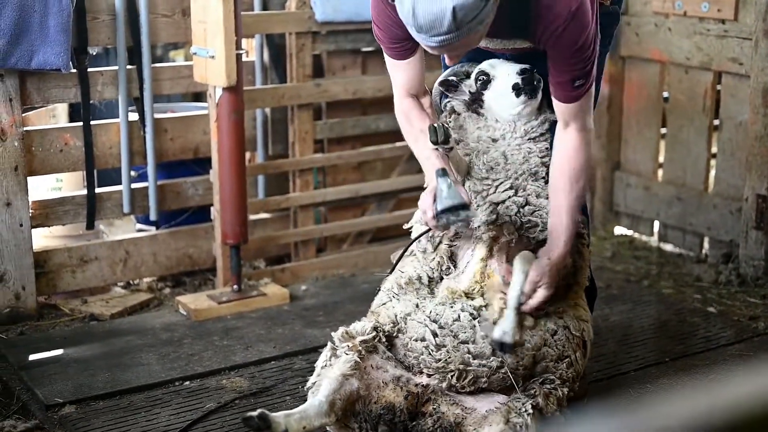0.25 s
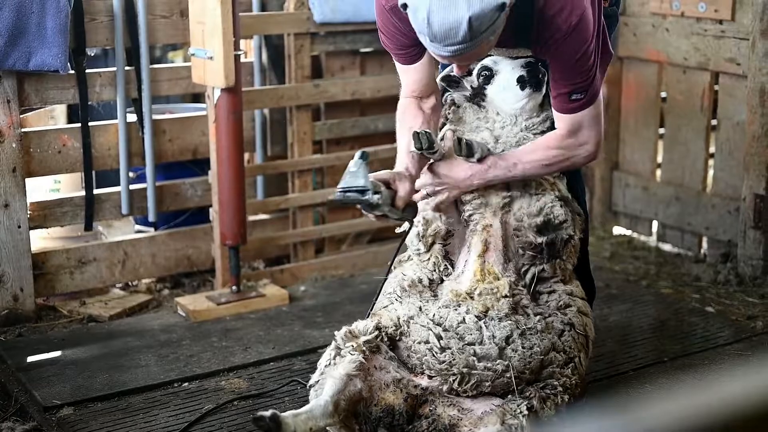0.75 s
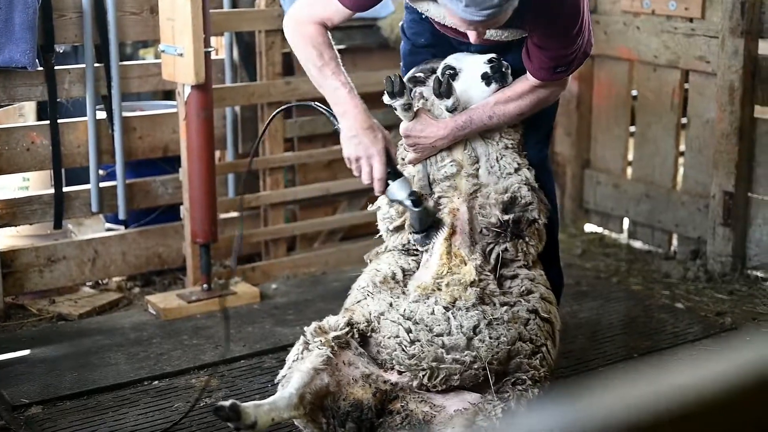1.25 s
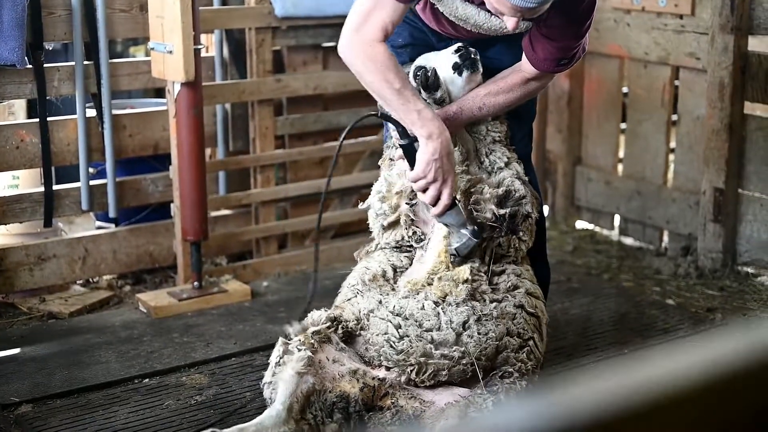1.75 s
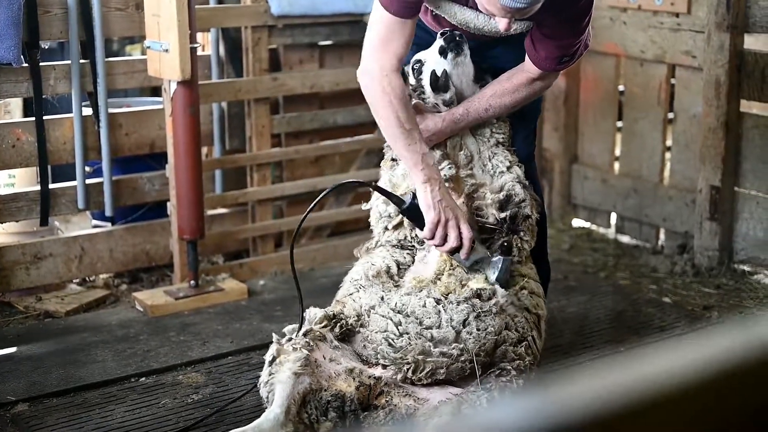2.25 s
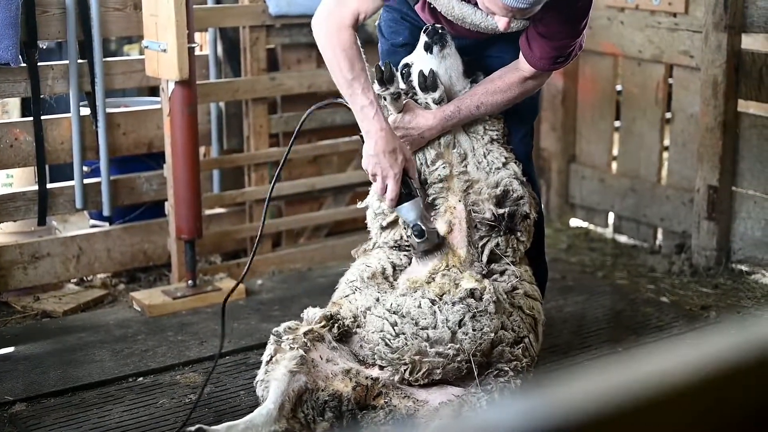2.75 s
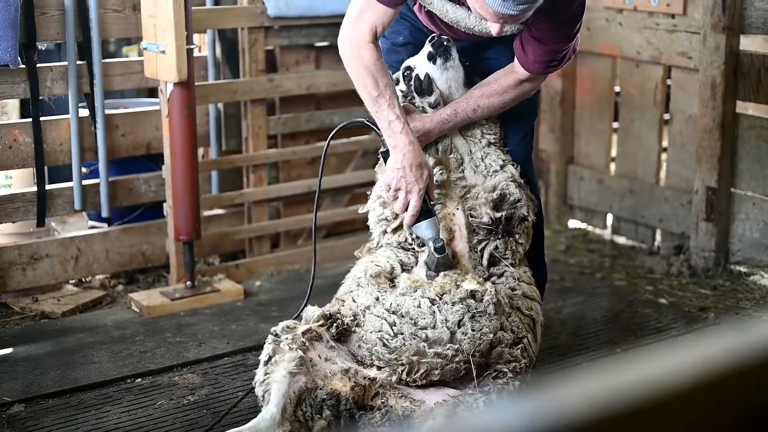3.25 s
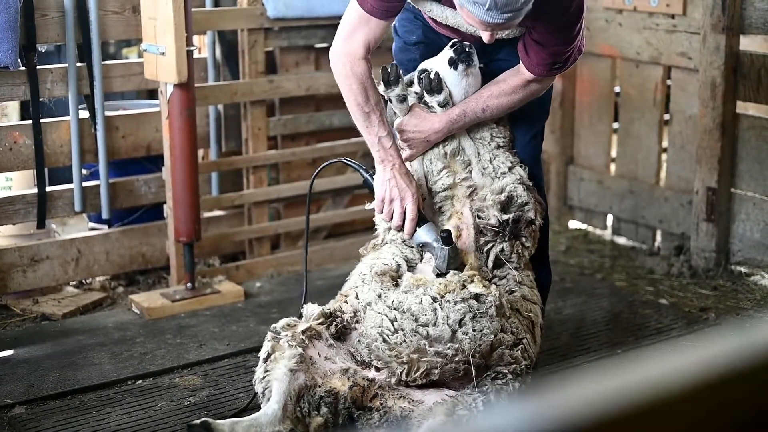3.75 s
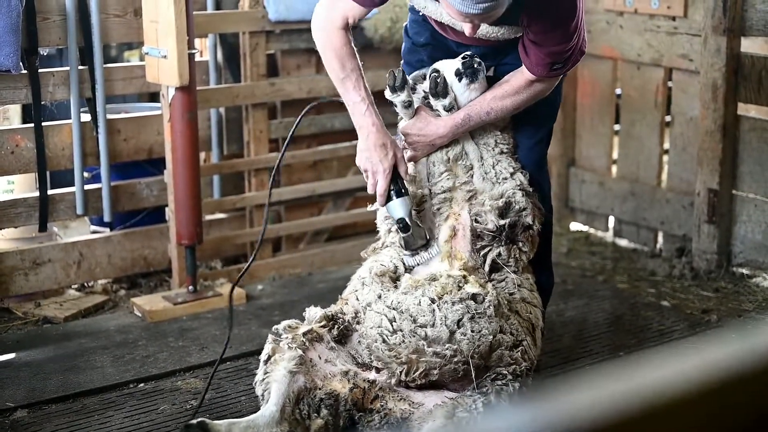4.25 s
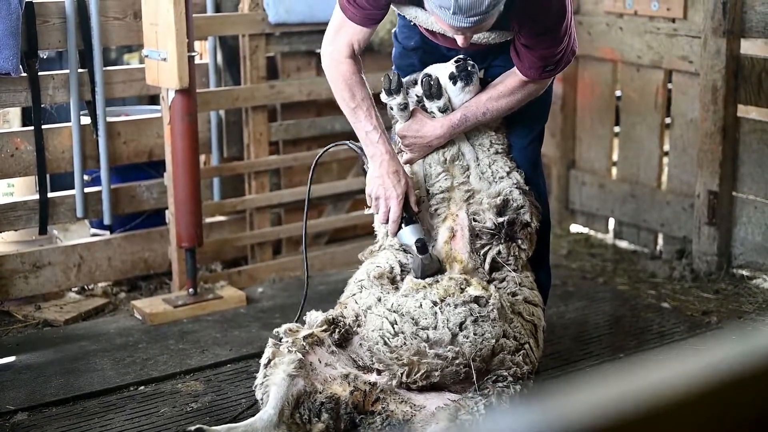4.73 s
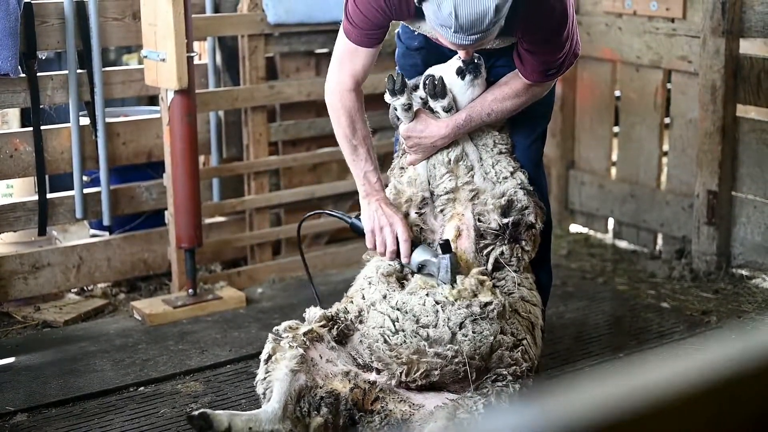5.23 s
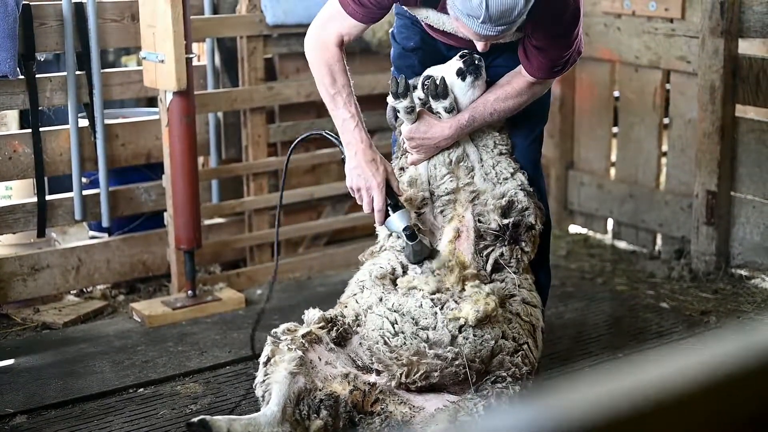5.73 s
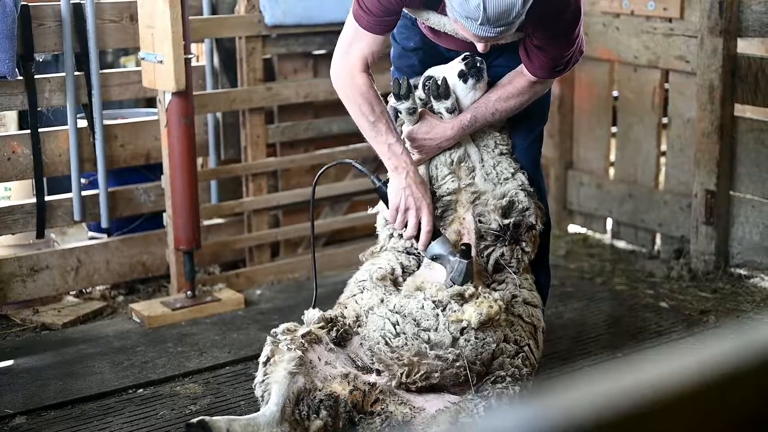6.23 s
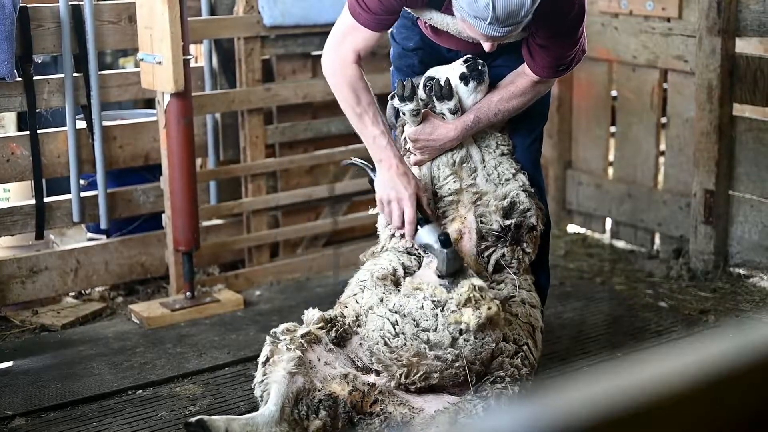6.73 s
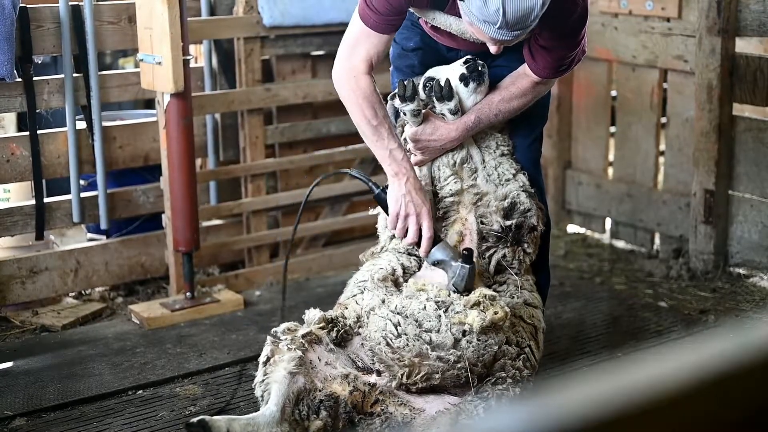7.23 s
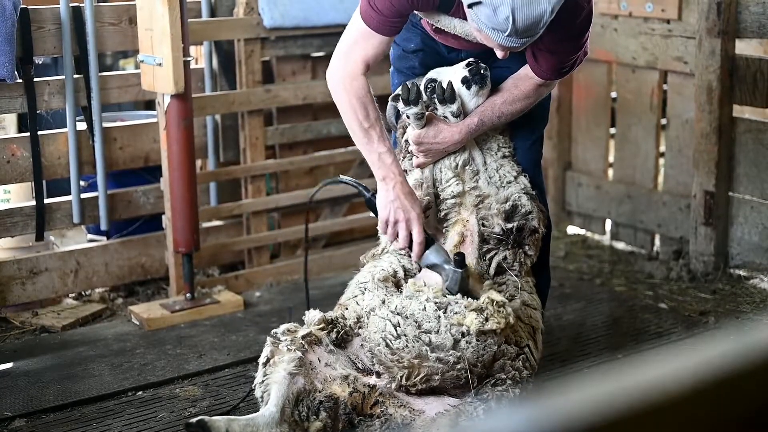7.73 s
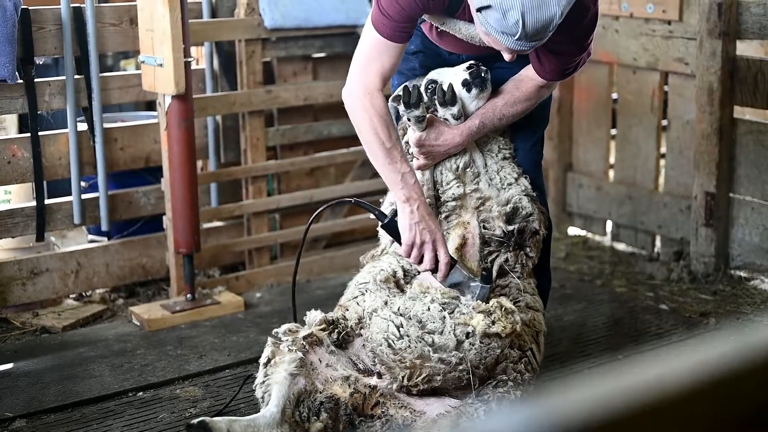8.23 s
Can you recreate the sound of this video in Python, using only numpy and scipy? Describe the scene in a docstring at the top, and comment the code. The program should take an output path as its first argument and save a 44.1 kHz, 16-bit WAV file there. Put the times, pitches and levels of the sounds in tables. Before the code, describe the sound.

Steady high motor whine, rushing fan air and buzzing cutter chatter as a sheep is shorn, its pitch sagging slightly under load.

```python
"""An electric shearing handpiece runs without pause in a wooden shed while a sheep is shorn.
Its motor fan whines and rushes; the geared-down cutter rattles the casing and rasps through the wool.
Each of six blows through the fleece drags the motor down and brings a hollow drone; held clear, the comb sings.
Tones are sines locked to one shaft; rattle, air and rasp are coloured noise under a force envelope.
The tones swell and fade as the hand moves through the shed's echoes, and at times the cutter clicks on the comb."""
import sys
import numpy as np
from scipy import signal
from scipy.fft import rfft, irfft, next_fast_len
from scipy.io import wavfile

SR = 44100
rng = np.random.default_rng(int(sys.argv[2]) if len(sys.argv) > 2 else 0)


def file_out(sig):
    """Save sig as 16-bit WAV at sys.argv[1]."""
    # one column per channel
    cols = np.atleast_2d(sig).T
    # limit, then scale
    lim = np.clip(cols, -1, 1)
    pcm = np.round(lim * 32767).astype(np.int16)
    wavfile.write(sys.argv[1], SR, pcm)


N = 373956
TIME = np.arange(N) / SR
FFT_SIZE = next_fast_len(N, real=True)
HZ = np.maximum(np.arange(FFT_SIZE // 2 + 1) * SR / FFT_SIZE, 1)
FAN_BLADES, ARMATURE_SLOTS = 8, 12
GEAR_RATIO = 41 / 5  # motor turns per cutter cycle

# Blows through the fleece. Each row: start in seconds, end in seconds, drag on the motor in Hz,
# rise of the housing's boom in dB, hollow drone in dB.
BLOWS = [(1.732, 2.264, 14.8, -2, -48), (2.941, 3.97, 22.4, 8, -56), (4.832, 5.539, 18.6, 9, -50),
         (6.001, 7.008, 11.3, 11, -55.5), (7.119, 7.774, 20.2, 4, -53), (7.922, 8.58, 23.7, 5, -57)]
# Colour of the fan's air, also used for the clicks. Each row: frequency in Hz, relative level in dB per Hz.
AIR_COLOUR = [(300, -60), (1200, -11), (2100, -6), (2500, 0), (2850, 0.5), (3200, 1), (3600, -1),
              (4050, -1), (4500, -7), (5200, -11.5), (6300, -8.5), (8000, -18.5), (15000, -33.5)]


def from_db(db):
    """Decibels to gain."""
    return 10 ** (np.asarray(db) / 20)


def rms_one(x):
    """Scale to unit rms."""
    return x / np.sqrt(np.mean(x ** 2) + 1e-20)


def in_time(rows):
    """A curve of (seconds, value) rows, read at every sample."""
    s, value = np.transpose(rows)
    return np.interp(TIME, s, value)


def at_hz(points, hz):
    """Read a table on a log-frequency axis."""
    f, value = np.transpose(points)
    return np.interp(np.log(hz), np.log(f), value)


def resonance_db(centre_hz, width_hz):
    """A resonance with steep skirts, in dB at every frequency."""
    return -20 * np.log10(1 + (2 * (HZ - centre_hz) / width_hz) ** 2)


def drift(rate):
    """Smooth random wander of rms 1, noise low-passed by two equal poles at rate in Hz."""
    step, warm_up = 100, 1000  # samples per slow step; slow steps thrown away
    pole = np.exp(-2 * np.pi * rate * step / SR)
    noise = rng.standard_normal(N // step + 2 + warm_up)
    slow = signal.lfilter([1], [1, -2 * pole, pole * pole], noise)[warm_up:]
    return np.interp(np.arange(N) / step, np.arange(len(slow)), rms_one(slow))


def sides(hz):
    """Left and right gain of the handpiece at these frequencies."""
    # The vents face left. Each row: frequency in Hz, left minus right in dB.
    balance = [(700, 0.5), (1140, 2.5), (1600, 1), (2500, 3.5), (3200, 5.5), (4000, 9.5), (5200, 8),
               (6300, 12.5), (8300, 7), (9900, 12), (11500, 1.5), (13000, -1.5)]
    return from_db(at_hz(balance, hz) * np.array([[.5], [-.5]]))


def cycle_pattern(cycles):
    """Noise that comes back alike in every cutter cycle, its pattern shifting with the grip."""
    grip = 1.2 * drift(1.2)
    one, other = [np.interp(cycles % 1, np.linspace(0, 1, 880), pattern)
                  for pattern in rng.standard_normal((2, 880))]
    return np.cos(grip) * one + np.sin(grip) * other


def radiate(force, spectrum_db, cycles=0, repeat=0):
    """Noise under a force envelope, coloured and spread in stereo; rms 1. The share repeat turns hiss into buzz."""
    # Likeness of the channels. Each row: frequency in Hz, left-right correlation before the balance.
    likeness = [(100, 1), (300, 0.95), (700, 0.82), (1400, 0.85), (2200, 0.42), (3200, 0.064), (5000, 0.38),
                (8000, 0.026), (15000, 0.068)]
    grain, spread = rng.standard_normal((2, N))
    if repeat > 0:
        patterns = [rms_one(cycle_pattern(cycles)), rms_one(cycle_pattern(cycles))]
        grain = np.sqrt(1 - repeat) * grain + np.sqrt(repeat) * patterns[0]
        spread = np.sqrt(1 - repeat) * spread + np.sqrt(repeat) * patterns[1]
    mid, side = rfft(force * np.array([grain, spread]), FFT_SIZE)
    alike = at_hz(likeness, HZ)
    pair = np.sqrt(1 + alike) * mid + np.sqrt(1 - alike) * side * [[1], [-1]]
    coloured = pair * sides(HZ) * from_db(spectrum_db)
    return rms_one(irfft(coloured, FFT_SIZE)[:, :N])


def tone(turns, scatter, rate):
    """A stereo sine plus its wall echoes, whose sum shifts as the hand moves; rms 1."""
    angle = 2 * np.pi * turns
    sine, cosine = np.sin(angle), np.cos(angle)
    return np.array([rms_one((1 + scatter * drift(rate)) * sine + scatter * drift(rate) * cosine)
                     for ear in range(2)])


def strokes(cycles, depth, decay, back_db, uneven_db):
    """The cutter knocks at both ends of its swing, out and back unequally, no two knocks alike."""
    back_at = 0.46  # share of the cutter cycle at which the return knock falls
    back = cycles % 1 >= back_at
    index = 2 * cycles.astype(int) + back
    since = cycles % 1 - back_at * back
    strength = from_db(back_db * back + uneven_db * rng.uniform(-1, 1, 1000)[index])
    return rms_one(1 + depth * strength * np.exp(-2 * since / decay))  # decay in cutter cycles


def arch(start_s, end_s, shape, lead_s):
    """The hand pushes in and eases off again: 0 to 1 to 0."""
    progress = np.clip((TIME + lead_s - start_s) / (end_s - start_s), 0, 1)
    return np.abs(np.sin(np.pi * progress)) ** shape


def swells(rows, shape, lead_s):
    """Each event's values rise and fall in an arch over its length: one curve per column."""
    return sum(np.outer(values, arch(start, end, shape, lead_s)) for start, end, *values in rows)


def part_level(part_db, rise_db, wander_db):
    """Gain of one part: it follows the given rise, changes while held clear, and wanders with the grip."""
    clear_until_s, settle_s = 1.22, 0.25  # held in the air, then laid on the fleece
    idle_db, clear_db = part_db
    clear = np.clip((clear_until_s - TIME) / settle_s + .5, 0, 1)
    return from_db(idle_db + rise_db + clear_db * clear + wander_db * drift(0.99))


def motor_speed():
    """Turns per second: the warming motor creeps up, each blow drags it down, and its inertia smooths both."""
    start_hz, free_hz, warming_hz_per_s = 392.9, 405.56, 3.79
    inertia_s, grab_s = 0.65, 0.12
    aim_hz = free_hz + warming_hz_per_s * TIME
    for start, end, drag_hz, *levels in BLOWS:
        aim_hz = aim_hz - drag_hz * np.clip(np.minimum(TIME - start, end - TIME) / grab_s + .5, 0, 1)
    keep = np.exp(-1 / (inertia_s * SR))
    return start_hz + signal.lfilter([1 - keep], [1, -keep], aim_hz - start_hz)


def percent_faster(speed_hz):
    """Motor speed above its mean, in percent."""
    return 100 * (speed_hz / speed_hz.mean() - 1)


def fan_whine(turns, level_db=-0.25, left_fade_db=1.27, right_fade_db=0.7):
    """Blades pass the vents: one piercing tone that the shed's standing waves swell and spread, with a fast flutter."""
    # Blade tone on the left, where the vents point. Each row: time in seconds, level before trim in dB.
    whine_left = [(0.0, -33), (0.07, -26), (0.18, -31.0), (0.21, -26), (0.29, -32), (0.48, -23),
                  (0.54, -31), (0.73, -22.5), (0.94, -24.5), (1.02, -35), (1.09, -43.5), (1.13, -34),
                  (1.19, -31), (1.215, -18.5), (1.37, -22.5), (1.41, -33), (1.5, -39), (1.52, -39.0),
                  (1.58, -22), (1.79, -20.5), (2.05, -27.5), (2.18, -23), (2.28, -23), (2.35, -32),
                  (2.41, -20), (2.45, -18.5), (2.54, -36), (2.68, -24.5), (2.86, -19.5), (3.08, -22),
                  (3.12, -26), (3.27, -23.5), (3.39, -23.5), (3.48, -39), (3.5, -45), (3.65, -23.5),
                  (3.76, -26), (3.99, -21.5), (4.04, -24.5), (4.26, -22.5), (4.59, -24), (4.68, -25.5),
                  (4.83, -22.5), (5.04, -35), (5.16, -32), (5.24, -26), (5.285, -45), (5.33, -28),
                  (5.41, -25), (5.45, -34), (5.52, -19.5), (5.69, -29), (5.78, -23), (5.99, -34),
                  (6.1, -35), (6.14, -27), (6.24, -25.5), (6.43, -44), (6.46, -31), (6.53, -45.5),
                  (6.58, -32), (6.68, -24), (6.72, -24.5), (6.76, -37), (6.83, -25.5), (6.88, -21.5),
                  (6.96, -39), (7.03, -24), (7.12, -21), (7.26, -24.5), (7.32, -29.5), (7.57, -21),
                  (7.65, -27), (7.77, -19.5), (7.9, -21.5), (8.2, -36.5), (8.27, -27), (8.47, -21)]
    # On the right, where it arrives mostly off the walls. Each row: time in seconds, level before trim in dB.
    whine_right = [(0.0, -32.5), (0.39, -41), (0.46, -43), (0.65, -30), (0.73, -49), (0.82, -44),
                   (1.01, -39), (1.07, -46), (1.16, -30), (1.58, -29.5), (1.66, -36), (1.8, -32),
                   (1.97, -41), (2.11, -25), (2.3, -30), (2.42, -27), (2.48, -38), (2.54, -25.5),
                   (2.75, -26.5), (2.91, -39), (3.16, -34), (3.49, -35), (3.58, -45), (4.07, -24.5),
                   (4.21, -33), (4.44, -34), (4.52, -35.5), (4.63, -29), (4.87, -32), (4.93, -43),
                   (4.99, -32), (5.24, -26), (5.285, -38), (5.33, -29), (5.62, -26), (5.81, -46),
                   (5.95, -21.5), (6.15, -27.5), (6.31, -36), (6.46, -27.5), (6.65, -30), (6.73, -23),
                   (6.83, -27), (7.14, -23.5), (7.26, -35), (7.32, -48.0), (7.37, -43), (7.56, -23),
                   (7.68, -31.5), (7.76, -23.5), (7.92, -30), (8.03, -49), (8.19, -30), (8.47, -32)]
    # Phase between the ears, as wall echoes take over from the direct sound.
    # Each row: time in seconds, left ahead of right in radians.
    whine_apart = [(0.0, -0.5), (0.09, 4.5), (0.3, -0.7), (0.52, 1), (0.9, 1.5), (1.22, 1.2), (1.37, -2),
                   (1.45, -2.5), (1.62, 0.2), (1.76, 2.5), (1.92, -0.5), (2.07, -3), (2.22, -1), (2.33, -2),
                   (2.43, 0.6), (3.0, -1.2), (3.42, -1), (3.53, 1.5), (3.78, 0.8), (4.7, -1.7), (5.23, -1),
                   (5.28, -2.5), (5.36, -1), (5.45, -1.5), (5.54, -0.5), (5.76, -3.5), (6.1, -0.7),
                   (6.45, 1.6), (6.85, -0.5), (6.96, 4), (7.15, -0.3), (7.55, 1.17), (8.47, -0.1)]
    apart = in_time(whine_apart) * np.array([[.5], [-.5]])
    flutter_db = .5 * np.array([drift(27), drift(25)])
    left_db = in_time(whine_left) + left_fade_db * drift(9.6)
    right_db = in_time(whine_right) + right_fade_db * drift(10.0)
    gain = from_db(level_db + np.array([left_db, right_db]) + flutter_db)
    return gain * np.sqrt(2) * np.sin(2 * np.pi * FAN_BLADES * turns + apart)


def upper_whines(turns, mean_hz, slot_db=-4.5, octave_db=-3.0, mains_hz=120, mains_depth=0.3):
    """The armature's slot tone, pulsing with the mains, and the octave of the blade tone."""
    # Slot tone. Each row: time in seconds, level before trim and stereo balance in dB.
    slot_level = [(0.0, -34), (0.13, -38), (0.25, -36), (0.39, -40), (0.47, -49), (1.15, -37),
                  (1.49, -44.0), (1.74, -36), (1.8, -46), (2.14, -30.5), (2.22, -40), (2.31, -35),
                  (2.54, -51), (2.7, -36), (2.98, -46), (3.07, -35), (3.28, -35), (3.33, -42), (3.41, -34),
                  (3.65, -35), (3.8, -28.5), (3.96, -47), (4.04, -45), (4.34, -46), (4.4, -39), (4.94, -44),
                  (5.12, -41), (5.42, -34), (5.51, -46.0), (5.61, -35), (5.67, -47.0), (6.09, -43.5),
                  (6.28, -49.0), (6.34, -40.5), (6.5, -33.5), (6.78, -50), (7.15, -54), (7.43, -36),
                  (7.54, -49), (7.67, -39), (7.94, -44), (8.12, -33), (8.47, -52)]
    # Octave of the blade tone. Each row: time in seconds, level before trim and stereo balance in dB.
    octave_level = [(0.0, -32), (0.13, -36.5), (0.45, -34.5), (1.28, -35.5), (1.58, -41), (1.96, -40),
                    (2.11, -41), (2.2, -48.5), (2.39, -34.5), (2.56, -49), (2.7, -37.5), (3.06, -41),
                    (3.31, -34.5), (4.28, -39), (4.8, -41), (5.16, -33.5), (5.37, -47), (5.54, -37),
                    (5.65, -43), (5.77, -37), (5.97, -51), (6.18, -37.5), (6.45, -32), (6.56, -43),
                    (6.84, -41), (7.25, -42), (7.42, -34.5), (7.9, -50), (8.02, -34.5), (8.47, -49)]
    pulsing = 1 + mains_depth * np.sin(2 * np.pi * mains_hz * TIME)
    slot = from_db(in_time(slot_level) + slot_db) * pulsing
    slot = slot * tone(ARMATURE_SLOTS * turns, scatter=0.26, rate=9.5)
    octave = from_db(in_time(octave_level) + octave_db) * tone(2 * FAN_BLADES * turns, scatter=0.42, rate=10)
    return sides(ARMATURE_SLOTS * mean_hz) * slot + sides(2 * FAN_BLADES * mean_hz) * octave


def motor(turns, speed_hz, fades_per_s_at_1khz=1.1, scatter_at_1khz=0.82):
    """The weaker multiples of the shaft speed; short waves fade faster and deeper."""
    # Each row: multiple of the motor speed, level at mean speed before stereo balance in dB,
    # growth in dB per percent of motor speed.
    motor_tones = [(1, -55.5, 0.5), (4, -47, 0.5), (6, -49.5, 2), (13, -55, 1), (14, -57, -1.5),
                   (15, -52.5, -1), (18, -55, -1), (20, -57.5, -2), (22, -64, -4), (23, -61, -2.5),
                   (24, -51, 0.5), (32, -62, -1)]
    out, faster, mean_hz = 0, percent_faster(speed_hz), speed_hz.mean()
    for multiple, level_db, growth_db in motor_tones:
        khz = multiple * mean_hz / 1000
        echoing = tone(multiple * turns, scatter_at_1khz * np.cbrt(khz), fades_per_s_at_1khz * khz)
        out += from_db(level_db + growth_db * faster) * sides(multiple * mean_hz) * echoing
    return out


def motor_hum(turns, mean_hz):
    """A thin hum at twice the shaft speed, with slow swells."""
    # Each row: time in seconds, level before stereo balance in dB.
    hum_level = [(0, -52), (1.2, -53), (2.3, -46), (2.8, -51), (3.3, -45), (3.78, -39.5), (4.3, -50),
                 (4.8, -42), (5.7, -47), (6.8, -46.5), (8.15, -43), (8.48, -53)]
    return from_db(in_time(hum_level)) * sides(2 * mean_hz) * tone(2 * turns, scatter=0.15, rate=1.5)


def cutter_hum(cycles, speed_hz):
    """Low multiples of the stroke rate, which grow or fade as the speed changes."""
    # Each row: multiple of the stroke rate, overall level in dB, growth in dB per percent of motor speed.
    cutter_tones = [(5, -69.5, 1.5), (6, -63, 2), (8, -63, -0.5), (9, -61.5, 3.5), (10, -58, -1),
                    (12, -67, -4), (18, -50, 3), (19, -54.5, 0.5), (20, -48.5, 0.5)]
    out, faster = 0, percent_faster(speed_hz)
    for multiple, level_db, growth_db in cutter_tones:
        swell = from_db(growth_db * faster + 3.5 * drift(3))
        sine = np.sin(2 * np.pi * (multiple * cycles + rng.random()))
        out += from_db(level_db) * rms_one(swell * sine)
    return out


def casing(cycles, clatter_db=0.33, rattle_db=1.5, split_hz=1300):
    """Cutter knocks shake the casing: a buzzing low clatter, a looser rattle above it and, under load, a boom."""
    # Broad colour of the rattle. Each row: frequency in Hz, relative level in dB per Hz.
    rattle_colour = [(100, -44), (300, -18.5), (550, -11.5), (700, -9.5), (1300, -6.5), (1900, -2),
                     (2400, -4), (3500, -10), (7000, -47)]
    # Casing resonances and one cancellation. Each row: centre in Hz, width in Hz, lift in dB.
    resonances = [(739, 107, 8), (851, 38, -3.5), (1008, 430, 12.5), (1610, 490, 4), (1877, 44, 3.5)]
    # Low clatter, which sinks between blows. Each row: time in seconds, level before trim in dB.
    clatter_level = [(0.0, -32), (0.2, -35.5), (0.33, -35.5), (0.97, -35.5), (1.06, -38), (1.58, -36),
                     (1.79, -37), (2.38, -35.5), (2.43, -41), (2.69, -36), (2.88, -38.5), (3.8, -32),
                     (4.3, -38), (4.96, -34), (5.45, -35), (5.69, -41.5), (5.81, -37.5), (6.56, -33.5),
                     (6.66, -40), (7.06, -36), (7.25, -40), (7.3, -33.5), (8.0, -37), (8.25, -33),
                     (8.48, -35.5)]
    # Upper rattle. Each row: time in seconds, level before trim in dB.
    rattle_level = [(0, -34), (0.65, -31.8), (1.1, -33), (1.29, -36), (1.52, -32.4), (1.9, -36.8),
                    (2.07, -32), (2.62, -33.5), (2.93, -37.5), (3.2, -34.5), (3.85, -32.3), (4.02, -36.5),
                    (4.4, -36.3), (4.98, -31.5), (5.2, -34), (5.84, -38), (6.47, -30.5), (6.7, -33.5),
                    (7.72, -31.5), (7.87, -35.5), (8.15, -30.5), (8.47, -32)]
    # Housing's boom: level idling on the fleece in dB, change while held clear in dB.
    housing_db = (-56, -12)
    casing_db = at_hz(rattle_colour, HZ)
    for hz, width, lift_db in resonances:
        casing_db = casing_db + lift_db / (1 + (2 * (HZ - hz) / width) ** 2)
    low_db = -10 * np.log10(1 + (HZ / split_hz) ** 8)
    high_db = -10 * np.log10(1 + (split_hz / HZ) ** 8)
    knocks = strokes(cycles, depth=0.7, decay=0.13, back_db=-8, uneven_db=5)
    clatter = from_db(in_time(clatter_level) + clatter_db)
    clatter = clatter * radiate(knocks, casing_db + low_db, cycles, repeat=0.12)
    rattle = from_db(in_time(rattle_level) + rattle_db)
    rattle = rattle * radiate(knocks, casing_db + high_db, cycles, repeat=0.07)
    drag_hz, boom_db, drone_db = swells(BLOWS, shape=1.0, lead_s=-0.2)  # the boom builds up late in each blow
    boom = part_level(housing_db, boom_db, wander_db=2.5)
    boom = boom * radiate(knocks, resonance_db(centre_hz=742, width_hz=91), cycles, repeat=0.17)
    return clatter + rattle + boom


def fan_air(cycles, level_db=8.0):
    """Fan air rushes from the vents, pulsing with the shaft and chopped by the cutter."""
    # Fan's rush. Each row: time in seconds, level before trim in dB.
    rush = [(0, -34), (0.5, -35.5), (1.1, -33.5), (1.35, -35.5), (1.55, -35), (1.9, -36), (2.5, -35.5),
            (2.72, -34), (2.98, -37), (3.6, -35), (4.3, -36), (4.6, -35), (5.85, -34.5), (6.2, -36),
            (6.85, -34.5), (7.3, -36.5), (8.48, -35)]
    flutter = 1 + .13 * np.sin(2 * np.pi * GEAR_RATIO * cycles)
    chatter = flutter * strokes(cycles, depth=1.45, decay=0.19, back_db=-11, uneven_db=3)
    return from_db(in_time(rush) + level_db) * radiate(chatter, at_hz(AIR_COLOUR, HZ), cycles, repeat=0.066)


def wool_rasp(cycles, level_db=4.5):
    """Fibres snap between the teeth: bright noise, roughened at random and pulsed by the strokes."""
    # Rasp of wool between the teeth. Each row: time in seconds, level before trim in dB.
    wool = [(0.0, -41), (1.1, -41), (2.57, -43.5), (2.64, -38), (2.86, -41.5), (3.42, -38), (3.71, -40),
            (3.8, -37.5), (4.23, -43), (5.15, -35), (5.64, -40.5), (6.04, -40.5), (6.54, -37.5),
            (7.16, -39.5), (7.41, -37.5), (7.91, -42), (8.17, -37), (8.48, -42)]
    # Colour of the rasp. Each row: frequency in Hz, relative level in dB per Hz.
    rasp_colour = [(300, -52), (2000, 0.5), (4000, -4), (5200, 2.5), (6300, 2.5), (7200, 3), (8400, 1),
                   (9900, 1.5), (10700, -3.5), (11500, -8), (15000, -11)]
    snaps = strokes(cycles, depth=0.65, decay=0.2, back_db=-7, uneven_db=3) * from_db(.5 * drift(120))
    return from_db(in_time(wool) + level_db) * radiate(snaps, at_hz(rasp_colour, HZ), cycles, repeat=0.025)


def gear_head(cycles):
    """The cutter's knocks keep the gear head ringing: pulsed noise through one resonance."""
    # Each row: time in seconds, level in dB.
    head_level = [(0.0, -46), (0.12, -35), (1.2, -41.5), (1.39, -38), (2.53, -41), (2.69, -31.5),
                  (2.88, -41), (2.97, -38), (4.27, -35.5), (5.62, -44.5), (5.83, -33), (6.14, -45),
                  (6.63, -38.5), (6.73, -44), (7.06, -34), (7.13, -48), (8.48, -35.5)]
    knocks = strokes(cycles, depth=1.0, decay=0.36, back_db=-23, uneven_db=1.0)
    ring = radiate(knocks, resonance_db(centre_hz=1132, width_hz=130), cycles, repeat=0.065)
    return from_db(in_time(head_level)) * ring


def comb_plate(comb_hz=2815, width_hz=150, sway_hz=20):
    """The comb plate sings hoarsely, a narrow band of noise, most when no wool damps it."""
    # Comb free of the wool. Each row: start in seconds, end in seconds, rise of the song in dB, pitch shift in Hz.
    lifts = [(0.22, 0.52, 0.5, 50), (0.52, 1.22, -2.5, 20), (2.48, 3.1, 7.5, 20), (3.98, 4.4, 3, -30),
             (6.66, 7.0, 3.5, -40)]
    # Comb plate: level idling on the fleece before stereo balance in dB, change while held clear in dB.
    comb_plate_db = (-38, 5.5)
    rise_db, shift_hz = swells(lifts, shape=0.48, lead_s=0.0059)
    angle = 2 * np.pi * np.cumsum(comb_hz + shift_hz + sway_hz * drift(0.96)) / SR
    song = np.array([drift(width_hz / 2) * np.sin(angle) + drift(width_hz / 2) * np.cos(angle)
                     for ear in range(2)])
    return part_level(comb_plate_db, rise_db, wander_db=2.0) * sides(comb_hz) * song


def pressing(cycles, idle_shake_db=-78, idle_drone_db=-53, rumble_db=-9):
    """Pressed on the animal, the handpiece makes its body thrum in short low tones and drones hollowly."""
    # The handpiece bears on the animal and shakes its body. Each row: start in seconds, end in seconds,
    # thrum at the stroke rate in dB, its octave in dB.
    shakes = [(1.39, 2.204, -73, -80), (2.797, 3.418, -76, -60), (3.203, 3.68, -64, -76),
              (3.72, 3.916, -60, -62), (4.756, 5.199, -68, -63)]
    # Colours of the body's rumble and the hollow drone. Each row: frequency in Hz, relative level in dB per Hz.
    body_colour, drone_colour = [(15, -24), (50, 2), (105, 1), (300, -10), (1000, -60)], [(100, -38), (340, -9), (410, -16), (475, 5.5), (570, -8.5),
                                               (700, -6.5), (2000, -43)]
    shake, octave, drone = from_db(idle_shake_db), 0, from_db(idle_drone_db)
    for start, end, shake_db, octave_db in shakes:
        weight = arch(start, end, shape=0.65, lead_s=0)
        shake = shake + from_db(shake_db) * weight
        octave = octave + from_db(octave_db) * weight
    for start, end, *rises, drone_db in BLOWS:
        drone = drone + from_db(drone_db) * arch(start, end, shape=0.95, lead_s=-0.051)
    thrum = np.sqrt(2) * (shake * np.sin(2 * np.pi * cycles) + octave * np.sin(4 * np.pi * cycles))
    rumble = from_db(rumble_db) * shake * radiate(1, at_hz(body_colour, HZ))
    return thrum + rumble + drone * radiate(1, at_hz(drone_colour, HZ))


def shed_rumble(level_db=-59.0):
    """The shed's steady low background, made of coloured noise."""
    # Each row: frequency in Hz, relative level in dB per Hz.
    shed_colour = [(15, -14), (30, -6), (60, 5), (200, 4), (350, -7), (1000, -18.5)]
    return from_db(level_db) * radiate(1, at_hz(shed_colour, HZ))


def top_hiss(level_db=-50, edge_hz=7000):
    """A thin, steady high-passed hiss, unrelated in the two channels."""
    high_pass = signal.butter(2, edge_hz, "high", fs=SR, output="sos")
    return from_db(level_db) * signal.sosfilt(high_pass, rng.standard_normal((2, N)))


def ticks(decay_s=0.023, level_db=-15):
    """Now and then the cutter catches the comb with a short bright click, a decaying burst of noise."""
    # Each row: time in seconds, strength before trim in dB.
    clicks = [(1.4323, -12), (1.473, -13), (1.513, -8), (1.5933, -9), (3.6827, -12), (4.0408, -10),
              (4.1016, -11), (4.2627, -11), (4.5625, -10), (5.3228, -8), (5.8117, -11), (5.871, -12),
              (6.027, -9), (6.6931, -10), (6.7325, -16), (6.9669, -14)]
    force = np.zeros(N)
    for s, strength_db in clicks:
        force[round(s * SR)] = from_db(strength_db)
    force = signal.lfilter([1], [1, -np.exp(-1 / (decay_s * SR))], force)
    force_rms = np.sqrt(np.mean(force ** 2))
    return from_db(level_db) * force_rms * radiate(force, at_hz(AIR_COLOUR, HZ))


def early_echoes(x, sway_s=0.000304, ears_apart_s=0.00005):
    """Each bounce arrives sooner or later as the hand moves, so their fine ripple wanders through the timbre."""
    # Early bounces off the boards and hurdles. Each row: mean lag in seconds, share relative to the direct sound.
    bounces = [(0.0017, 0.14), (0.0031, 0.15), (0.0048, 0.17), (0.0066, 0.17), (0.0085, 0.17),
               (0.0104, 0.15), (0.0156, 0.17)]
    out = x.copy()
    for lag_s, share in bounces:
        late = TIME - lag_s - sway_s * drift(0.599)
        apart = ears_apart_s * drift(0.52)
        out += share * np.array([np.interp(late + side * apart, TIME, ear, left=0)
                                 for side, ear in zip((1, -1), x)])
    return out / np.sqrt(1 + sum(share ** 2 for lag_s, share in bounces))


def scene():
    """One shaft drives the fan directly and the cutter through a gear; the shed and a hiss lie behind."""
    speed_hz = motor_speed() * (1 + 0.00028 * drift(12.3))
    mean_hz = speed_hz.mean()
    turns = np.cumsum(speed_hz) / SR
    cycles = turns / GEAR_RATIO
    tones = fan_whine(turns) + upper_whines(turns, mean_hz) + motor(turns, speed_hz)
    hums = motor_hum(turns, mean_hz) + cutter_hum(cycles, speed_hz)
    cutting = casing(cycles) + fan_air(cycles) + wool_rasp(cycles)
    ringing = gear_head(cycles) + comb_plate()
    blades = early_echoes(cutting + ringing + ticks())
    return tones + hums + blades + pressing(cycles) + shed_rumble() + top_hiss()


def record(dry):
    """The top of the spectrum is cut steeply above 15750 Hz."""
    return signal.sosfilt(signal.ellip(12, .1, 80, 15750, fs=SR, output="sos"), dry)


dry = scene()
out = record(dry)
file_out(out)
```